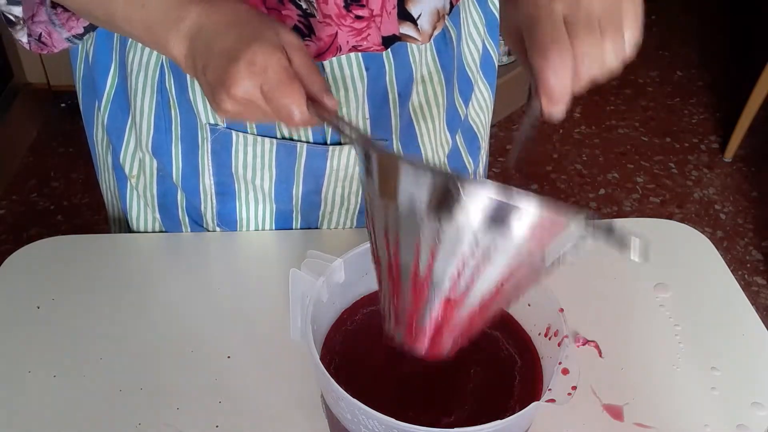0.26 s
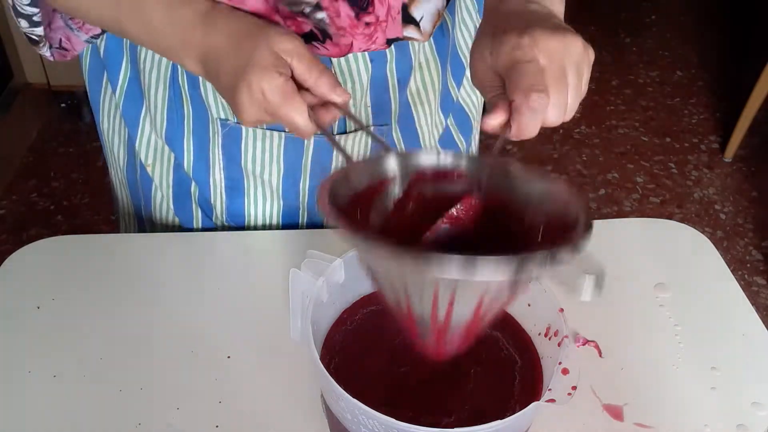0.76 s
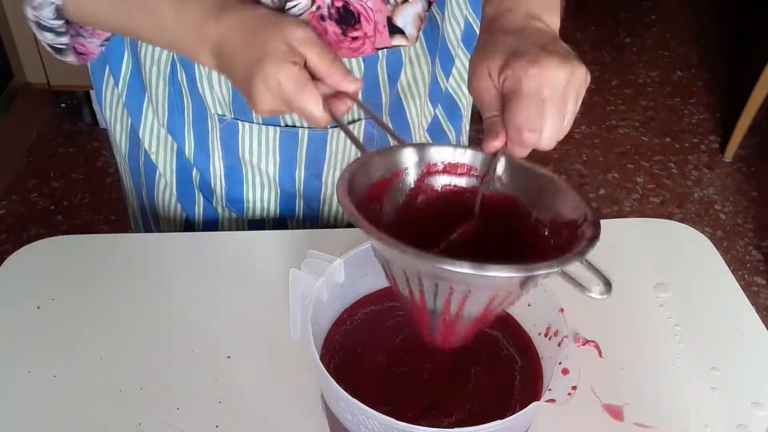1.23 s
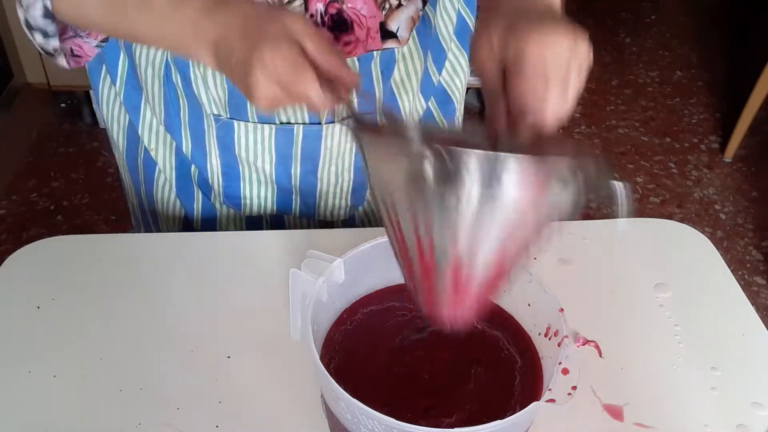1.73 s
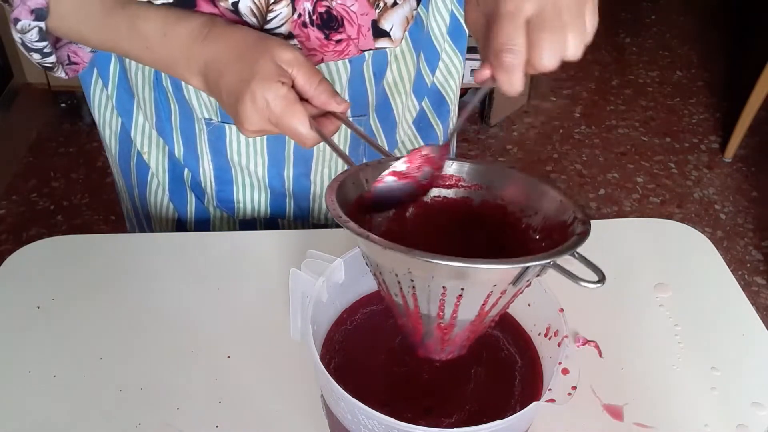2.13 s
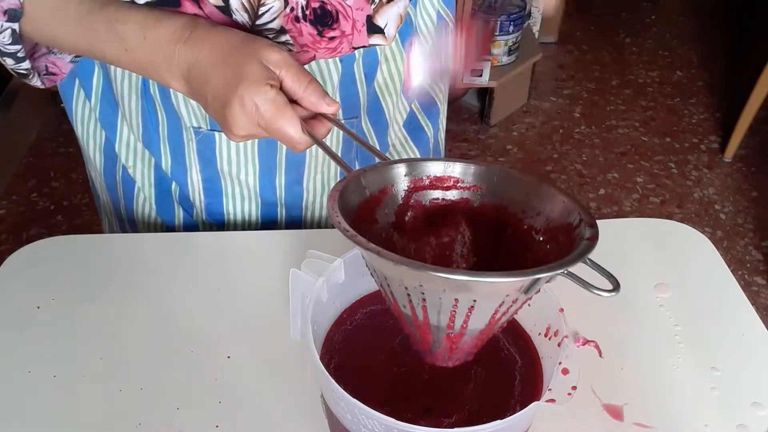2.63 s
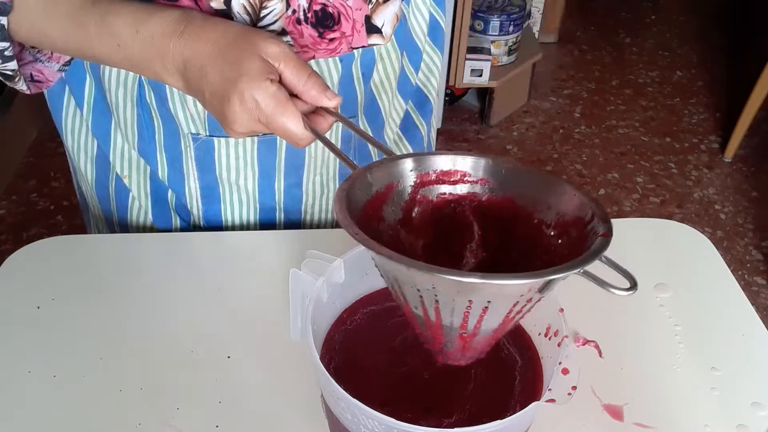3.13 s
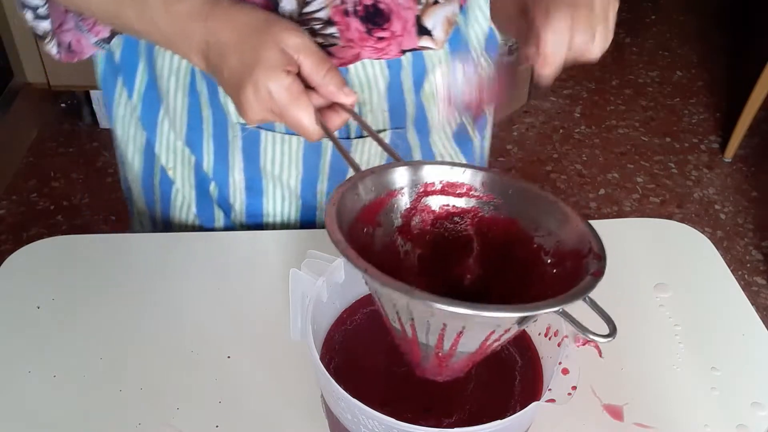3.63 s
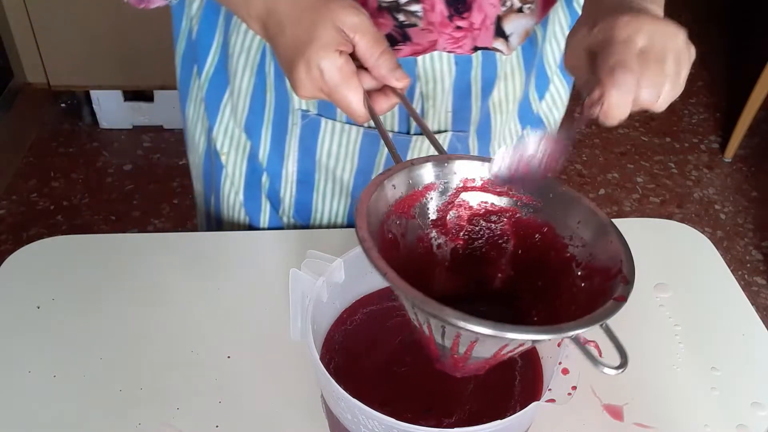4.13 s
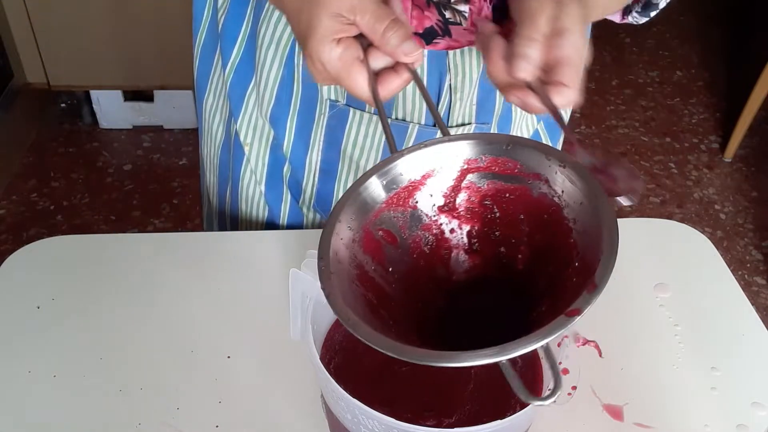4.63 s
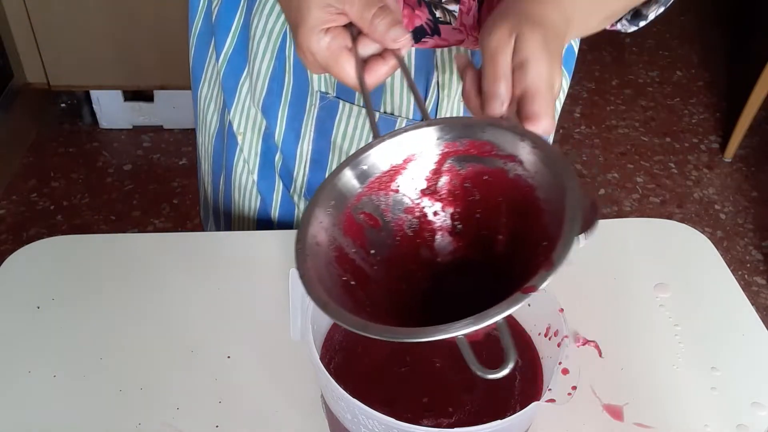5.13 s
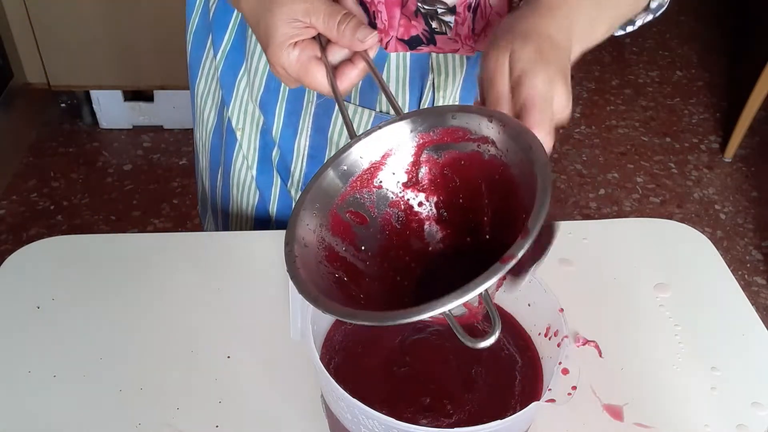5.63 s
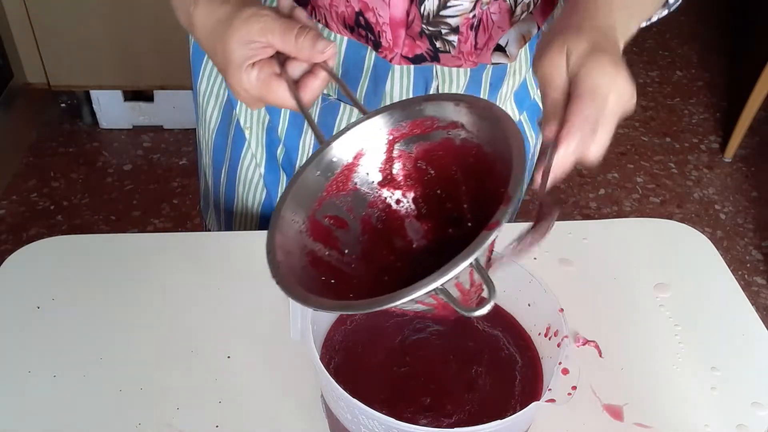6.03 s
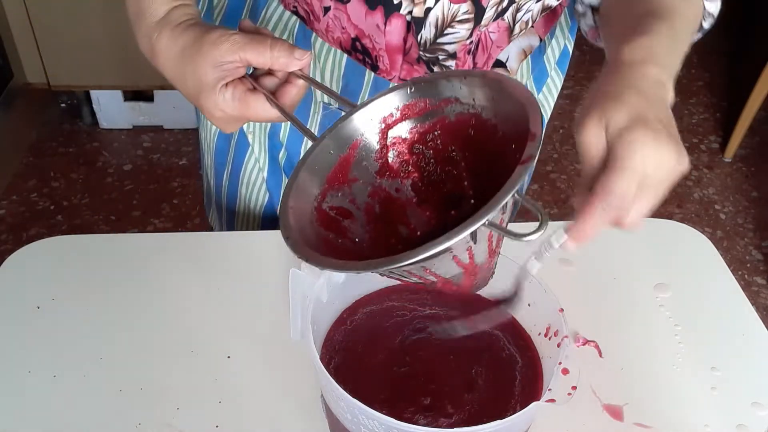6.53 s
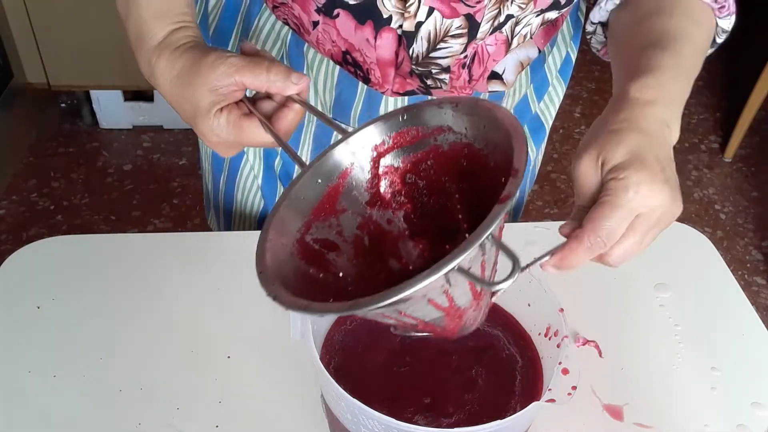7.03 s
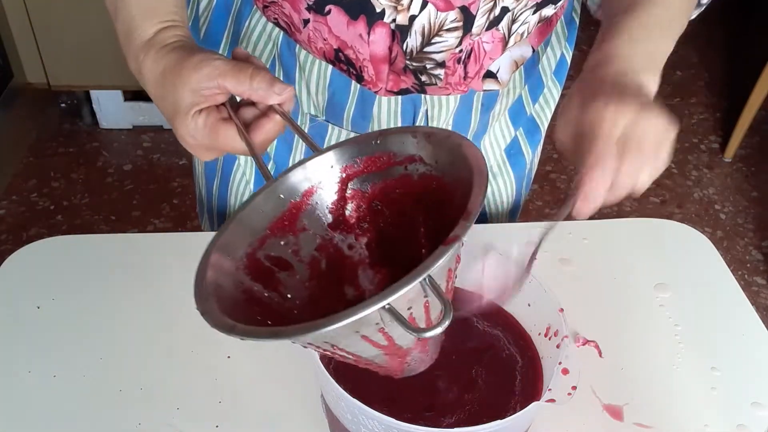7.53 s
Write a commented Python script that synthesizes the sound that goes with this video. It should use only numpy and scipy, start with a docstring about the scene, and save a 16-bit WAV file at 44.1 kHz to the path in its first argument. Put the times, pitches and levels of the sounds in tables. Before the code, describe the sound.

In a hard-walled kitchen, heard in stereo over faint hiss and rumble, a spoon works wet pulp through a metal strainer. Damped metallic knocks come first, then very soft squelching, then a sharp rattling rap with a low thud about halfway through. The rest is light clinks and brief gritty scrapes over the strainer's holes. The steel barely rings, leaving mostly a short room tail.

```python
"""A hard-walled kitchen, on a stereo pair with a conical steel strainer slightly nearer the left mic.
A steel spoon knocks inside the cone, scoops wet pulp, raps once on the rim, then taps and scrapes
the pulp off the perforated outer wall. Pulp in the contact dulls each touch. The steel is damped
by pulp and by the hand, so most of each tail is the room. Faint hiss and rumble lie underneath."""
import sys
import numpy as np
from scipy import signal
from scipy.fft import rfft, irfft, next_fast_len
from scipy.io import wavfile
from scipy.ndimage import uniform_filter1d, map_coordinates

SR = 44100
rng = np.random.default_rng(int(sys.argv[2]) if len(sys.argv) > 2 else 0)


def dump_mix(stems):
    """Bounce the given channels to the path in sys.argv[1] as a 16-bit WAV at rate SR."""
    frames = np.atleast_2d(stems).T  # one column per channel
    limited = np.clip(frames, -1, 1)  # hard clip at full scale
    pcm = np.round(limited * 32767).astype(np.int16)
    wavfile.write(sys.argv[1], SR, pcm)


N = 342657
LENGTH = 32768  # samples for one event and its tail
T = np.arange(LENGTH) / SR

# what the steel radiates: (frequency [Hz], gain [dB])
STEEL_RADIATION = [(30, -18), (120, -5), (190, -2.5), (250, -4.5), (320, -2.5), (450, -0.5), (11000, 0),
                   (13500, -5), (16000, -4)]


def knocks(chatter_t60=.075, tip_wet_db=0, rim_wet_db=2):
    """Each touch of the spoon is one clean blow, then a chatter of tiny ones as it skids."""
    # spoon meets strainer: (time [s], level [dB], place [0 tip, 1 rim, 2 and up outer wall],
    # low cut [Hz], cushion corner [Hz], spoon ring [dB], chatter [dB])
    contacts = [(.094, -44, 1.44, 2020, 5230, -1.5, 14), (0.852, -19.5, 0.019, 660, 4550, -10, 3.5),
                (0.9805, -25.5, 0, 480, 3900, -32, -11.5), (1.593, -34.5, 0.067, 800, 2310, -29, 9),
                (1.724, -36, 0, 950, 2320, -15, -26), (1.865, -32.5, 0.82, 100, 2700, -21.5, 2),
                (2.183, -28, 1, 394, 3000, -14, 7.5), (2.311, -26.5, 0.88, 250, 2600, -20, 5.5),
                (2.3602, -21, 0.8, 1000, 3280, -24, -18), (3.958, -18, 0.58, 300, 7540, -5.5, -8),
                (3.981, -25, 0.44, 251, 6650, -13, 5), (4.004, -25, 1.08, 252, 7260, -12.5, -3),
                (4.784, -34, 1.9, 520, 1052, -20, 5), (5.253, -30, 2.3, 200, 4230, -11.5, 8),
                (5.471, -22, 0.97, 950, 830, 4.5, -4.5), (5.625, -23.5, 2.8, 560, 4300, -13.5, -1.5),
                (5.964, -29, 2.14, 990, 2500, -16.5, 2), (6.121, -33, 2.7, 1490, 3400, -6.5, 3),
                (6.275, -24, 0.83, 1140, 750, 4.5, 3), (6.335, -29, 2.26, 1050, 2300, -12, -5),
                (6.497, -44, 1.7, 807, 2190, 1.5, -2), (6.75, -31, 1.58, 950, 1960, -31, 4),
                (6.978, -32.5, .9, 775, 900, 1, -2)]
    out = np.zeros((2, N))
    for start, db, place, low_hz, corner_hz, spoon_db, chatter_db in contacts:
        chatter = grains(rate=2500, noise_db=-10.5) * amp(-60 * T / chatter_t60)
        force = signal.unit_impulse(LENGTH) + amp(chatter_db) * unit(chatter) / np.sqrt(LENGTH)
        ring = coloured(cushioned(steel(place, spoon_db), low_hz, corner_hz), STEEL_RADIATION)
        # the cone beams blows at its tip outward like a horn, so they sound drier
        wet_db = np.interp(place, [0, 1], [tip_wet_db, rim_wet_db])
        blow = kitchen(through(force, ring), wet_db)
        add(out, start, at_level(blow, db, 0))
    return out


def steel(place, spoon_db, scatter_db=1.0, spread_rad=0.88, attack_s=0.00028):
    """Strainer and spoon after one contact: a click, then their damped modes ring."""
    # (frequency [Hz], width [Hz], level struck at the tip [dB], at the rim [dB], on the outer wall [dB])
    strainer_modes = [(330, 20, 18, 19, 19), (342, 9, 17, 16, 20), (417, 22, 17, 16, 12),
                      (497, 13, 9, 4, 10), (607, 15, 6, 10, 4), (693, 17, 8, 9, 10), (754, 19, 9, 6, 13),
                      (853, 21, 10, 14, 20), (922, 64, 13, 18, 22), (1109, 77, 10, 9, -12),
                      (1327, 93, 16, 6, -12), (1619, 102, 3, 14, 8), (1867, 35, 9, 6, 21),
                      (2030, 131, 16, 8, 9), (2180, 55, 9, 10, 10), (2486, 174, -12, 12, 14),
                      (2850, 72, 8, 8, 11), (3045, 77, 15, 8, 8), (3413, 239, 15, 14, 14),
                      (4202, 294, 16, 12, 10), (4712, 118, 10, 10, 9), (5202, 364, 2, 11, 12),
                      (6268, 438, 11, 11, 8), (7593, 192, 8, 6, 4), (8020, 201, 7, 8, 5),
                      (9358, 655, 9, 12, 11), (10641, 745, 12, 8, 7), (12101, 847, 5, 7, 8)]
    # (frequency [Hz], width [Hz], level [dB])
    spoon_modes = [(2355, 160, 13), (3384, 91, 20), (3632, 254, 15), (4715, 118, 13), (5967, 350, 14),
                   (9130, 590, 15), (12338, 260, 18), (13135, 402, 18), (14607, 224, 12)]
    modes = [(hz, width, np.interp(place, [0, 1, 2], dbs)) for hz, width, *dbs in strainer_modes]
    modes += [(hz, width, db + spoon_db) for hz, width, db in spoon_modes]
    t = T[:LENGTH // 4]
    ring = np.zeros((2, len(t)))
    for hz, width, db in modes:
        # high modes reach the two mics with different phases
        phase = rng.uniform(0, 2 * np.pi) + rng.normal(0, spread_rad * min(hz / 2000, 1), (2, 1))
        size = amp(db + rng.normal(0, scatter_db)) * 2 * np.pi * width / SR
        ring += size * np.exp(-np.pi * width * t) * np.sin(2 * np.pi * hz * t + phase)
    return ring * (1 - np.exp(-t / attack_s)) + signal.unit_impulse(len(t))


def cushioned(x, low_hz, corner_hz, leak_db=-13, order=4):
    """A light touch barely moves the low modes; pulp dulls all above a corner, save a small leak."""
    def gain(hz):
        low_cut = hz ** 4 / (hz ** 4 + low_hz ** 4)
        cushion = 1 / (1 + (hz / corner_hz) ** order)
        return np.sqrt(low_cut * (cushion + amp(leak_db) ** 2))
    return filtered(x, gain)


def scrapes(rough_db=3, low_hz=700):
    """The spoon's edge catches on hole after hole, and the rub rings the pressed steel."""
    # spoon drawn over the holes: (crest [s], rise [s], fall [s], level [dB], cushion corner [Hz],
    # steel ring [dB])
    strokes = [(2.305, 0.07, 0.043, -27.5, 12580, -9), (4.89, 0.049, 0.052, -33.5, 11800, -6),
               (5.316, .069, 0.034, -33.5, 10040, -7.5), (5.72, .067, 0.0054, -34.5, 13000, -4.5),
               (6.1, 0.08, 0.029, -43, 9500, -6), (6.505, 0.069, 0.006, -40.5, 9150, -2),
               (7.091, .105, 0.17, -44.5, 10950, 12), (7.246, .09, 0.014, -40.5, 9900, -8.5)]
    out = np.zeros((2, N))
    for crest, rise, fall, db, corner_hz, ring_db in strokes:
        pressure = stroke(rise, fall, start_db=-11, end_db=-10.5) * amp(rough_db * wobble(200, LENGTH))
        catches = grains(rate=1400, noise_db=-0.5) * pressure
        rub = coloured(cushioned(catches, low_hz, corner_hz), STEEL_RADIATION)
        ring = amp(ring_db) * through(rub, steel(place=1.8, spoon_db=-3))
        sound = kitchen(rub + ring, wet_db=1)
        add(out, crest - rise, at_level(sound, db, rise - .02))
    return out


def slide(low_width_hz=240, high_width_hz=380, rough_db=3):
    """Uneven friction excites resonances that move as the contact runs along the spoon."""
    # two spoon resonances in the last stroke: (time [s], low [Hz], high [Hz], drive [dB])
    glide = [(6.99, 1043, 3440, -46), (7.059, 980, 3690, -48), (7.115, 1030, 3830, -44),
             (7.145, 1152, 3300, -45.5), (7.159, 1080, 2607, -31), (7.175, 895, 1897, -37.5),
             (7.21, 862, 1774, -44), (7.25, 850, 1720, -60)]
    out = np.zeros((2, N))
    times, low_hz, high_hz, drive_db = np.transpose(glide)
    t = times[0] + T
    friction = amp(np.interp(t, times, drive_db, right=-120) + rough_db * wobble(116, LENGTH))
    resonances = [(low_hz, low_width_hz, -4), (high_hz, high_width_hz, -5),
                  (1.5 * high_hz, high_width_hz, -13)]
    for hz, width, mode_db in resonances:
        flutter = wobble(width, LENGTH) + 1j * wobble(width, LENGTH)
        phase = 2 * np.pi * np.cumsum(np.interp(t, times, hz)) / SR
        tone = unit(np.real(flutter * np.exp(1j * phase)))
        add(out, times[0], kitchen(tone * friction * amp(mode_db), wet_db=1))
    return out


def jolts(t60=0.11):
    """A hard blow pushes the cone and its handle: a low thud, mostly on the right mic."""
    # the hardest blows: (time [s], strength [dB])
    blows = [(0.854, -49.5), (2.359, -49), (3.956, -29.5)]
    # (frequency [Hz], gain [dB])
    thud_spectrum = [(25, -22.5), (55, -15), (85, -3), (115, 6.5), (150, -5.5), (230, -5), (310, -5),
                     (380, -25), (700, -74.5)]
    out = np.zeros((2, N))
    for start, db in blows:
        thud = unit(coloured(rng.standard_normal(LENGTH), thud_spectrum)) * amp(db - 60 * T / t60)
        add(out, start, kitchen(thud, wet_db=-14) * amp([[-8], [1]]))
    return out


def pulp():
    """Wet pulp squelches softly: many small bursts and no metal ring."""
    # pulp squeezed and shifted: (crest [s], rise [s], fall [s], level [dB], low cut [Hz],
    # cushion corner [Hz])
    squeezes = [(.048, 0.056, 0.012, -56.5, 220, 5500), (2.7, 0.071, 0.078, -46, 180, 775),
                (3.092, .02, 0.088, -56.5, 750, 5500), (3.282, .11, 0.15, -61, 1650, 5500),
                (3.474, .051, 0.093, -53.5, 112, 355)]
    # (frequency [Hz], gain [dB])
    squelch_spectrum = [(40, -24), (150, -3), (300, 1), (2000, 0.5), (5000, -2.5), (11000, -3), (16000, -6)]
    out = np.zeros((2, N))
    for crest, rise, fall, db, low_hz, corner_hz in squeezes:
        bursts = grains(rate=2000, noise_db=0) * stroke(rise, fall, start_db=-5, end_db=-8)
        muffled = cushioned(bursts, low_hz, corner_hz, leak_db=-35, order=3)
        squelch = kitchen(coloured(muffled, squelch_spectrum), wet_db=0.5)
        add(out, crest - rise, at_level(squelch, db, rise - .02))
    return out


def stroke(rise, fall, start_db, end_db):
    """Pressure builds to the crest, eases, and stops as the spoon lifts."""
    pressure = amp(np.interp(T, [0, rise, rise + fall], [start_db, 0, end_db]))
    landing = np.clip(2 * T / rise, 0, 1)
    lift = np.clip((rise + fall - T) / .012 + 1, 0, 1)
    return pressure * landing * lift


def grains(rate, noise_db):
    """Tiny slips or bursts of random size, about rate a second, over a smooth rub."""
    slips = (rng.random(LENGTH) < rate / SR) * rng.standard_normal(LENGTH)
    return unit(slips) + amp(noise_db) * rng.standard_normal(LENGTH)


def kitchen(x, wet_db, build_s=0.0045, early_db=-13):
    """The mics get the direct sound, a few echoes off table and bowl, then the room's tail."""
    # reverberation of the hard walls: (frequency [Hz], t60 [s])
    decay_times = [(100, 0.5), (400, .36), (1000, 0.29), (4500, 0.33), (8000, 0.28), (15000, .28)]
    hz, t, spectra = signal.stft(diffuse(LENGTH), SR, nperseg=256)
    decay = amp(-60 * t / along(decay_times, hz)[:, None])
    tail = signal.istft(spectra * decay, SR, nperseg=256)[1][:, :LENGTH]
    tail *= 1 - np.exp(-(T / build_s) ** 2)
    response = amp(wet_db) * unit(tail) / np.sqrt(LENGTH)
    for channel in response:
        echo_delays = (rng.uniform(.0003, .009, size=6) * SR).astype(int)
        channel[echo_delays] += amp(early_db) * rng.standard_normal(size=6)
    response[:, 0] += 1  # direct sound
    return through(x, response)


def room_tone(floor_db=-72, swell_trim_db=-1, patchy_db=6):
    """Steady hiss and rumble, and a low room noise that wavers."""
    # the low noise swells and fades: (time [s], level before trim [dB])
    swells = [(0, -64), (.35, -58), (.8, -64.5), (1.35, -78.5), (1.95, -56), (2.6, -61.5), (3.45, -73.5),
              (3.9, -62.5), (4.35, -75.5), (4.7, -62.5), (5.1, -78), (5.5, -65), (5.87, -51.5),
              (6.2, -68.5), (6.7, -62), (7.5, -72.5), (7.77, -63)]
    # its colour: (frequency [Hz], gain [dB])
    low_spectrum = [(100, -16), (250, -8), (340, -1.5), (440, -1.5), (560, -12), (900, -19), (1800, -29),
                    (4000, -42)]
    # hiss and rumble: (frequency [Hz], gain [dB])
    floor_spectrum = [(20, -18), (35, -10), (60, -10), (110, 2), (200, -5), (450, -10), (900, -10.5),
                      (2000, -16.5), (5000, -24), (10000, -23.5), (16000, -26)]
    spectra = signal.stft(diffuse(N), nperseg=2048)[2]
    patches = uniform_filter1d(rng.standard_normal(spectra.shape[1:]), size=3, axis=0)  # across pitch
    patches = uniform_filter1d(patches, size=5, axis=1)  # across time
    wavering = signal.istft(spectra * amp(patchy_db * unit(patches)), nperseg=2048)[1][:, :N]
    swell_db = np.interp(np.arange(N) / SR, *np.transpose(swells)) + swell_trim_db
    low_noise = amp(swell_db) * unit(coloured(wavering, low_spectrum))
    return low_noise + amp(floor_db) * unit(coloured(diffuse(N), floor_spectrum))


def diffuse(n):
    """Noise from all sides: alike at both mics in the bass, unrelated in the treble."""
    # (frequency [Hz], left-right correlation [0 to 1])
    likeness = [(100, .85), (350, 0.72), (700, 0.78), (1400, .45), (2500, 0.17), (6000, 0)]

    def mid_side_gains(hz):
        angle = np.arccos(along(likeness, hz)) / 2
        return np.array([np.cos(angle), np.sin(angle)])
    mid, side = filtered(rng.standard_normal((2, n)), mid_side_gains)
    return np.array([mid + side, mid - side])


def amp(db):
    """Decibels to gain."""
    return 10 ** (np.asarray(db) / 20)


def unit(x):
    """x scaled to rms 1."""
    return x / np.sqrt(np.mean(x ** 2) + 1e-20)


def at_level(x, db, start):
    """x scaled so that the 40 ms from start have this rms level."""
    part = x[:, max(round(start * SR), 0):][:, :SR // 25]
    return x * amp(db) / np.sqrt(np.mean(part ** 2) + 1e-20)


def along(points, hz):
    """A curve of (frequency [Hz], value) points, read on a log axis."""
    knots_hz, values = np.transpose(points)
    return np.interp(np.log(hz + 1), np.log(knots_hz + 1), values)


def filtered(x, response):
    """x with its spectrum multiplied by response(hz)."""
    n = x.shape[-1]
    padded = next_fast_len(n + SR // 10)
    return irfft(rfft(x, padded) * response(np.fft.rfftfreq(padded, 1 / SR)), padded)[..., :n]


def coloured(x, points):
    """x through a (frequency [Hz], gain [dB]) curve."""
    return filtered(x, lambda hz: amp(along(points, hz)))


def wobble(rate, n):
    """A smooth random curve, rate knots a second."""
    return map_coordinates(rng.standard_normal(int(n * rate / SR) + 4), [np.arange(n) * rate / SR])


def through(x, response):
    """x convolved with a stereo impulse response."""
    return signal.fftconvolve(np.atleast_2d(x), response, axes=1)[:, :LENGTH]


def add(track, start, x):
    """Mix x into the track, start seconds in."""
    part = track[:, max(round(start * SR), 0):][:, :LENGTH]
    part += x[:, :part.shape[1]]


def scene(left_lead_s=.000018):
    """Steel and pulp over room tone; the strainer sits slightly nearer the left mic."""
    # balance of the pair: (frequency [Hz], left minus right [dB])
    balance = [(1000, -0.74), (2500, 0.5), (5000, -2.5), (9000, 1.5), (13000, 3)]
    sides = np.array([[1], [-1]])

    def mic_pair(hz):
        return amp(sides * along(balance, hz) / 2) * np.exp(1j * np.pi * hz * left_lead_s * sides)
    straining = knocks() + scrapes() + slide() + jolts() + pulp()
    return filtered(straining, mic_pair) + room_tone()


def record(dry, top_hz=16000):
    """The recorder keeps nothing above its band limit."""
    return filtered(dry, lambda hz: 1 / np.sqrt(1 + (hz / top_hz) ** 160))


dry = scene()
out = record(dry)
dump_mix(out)
```